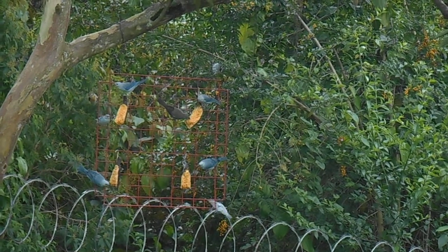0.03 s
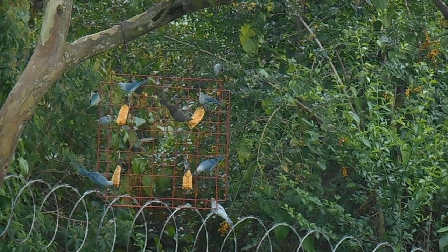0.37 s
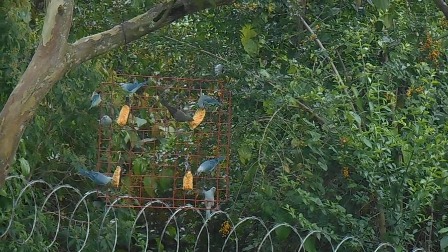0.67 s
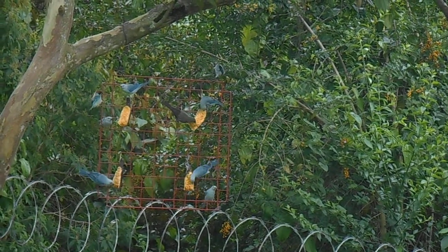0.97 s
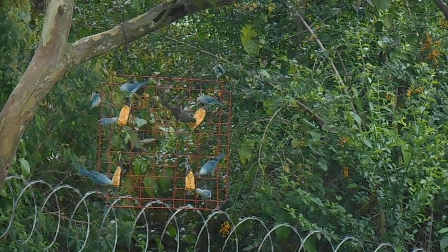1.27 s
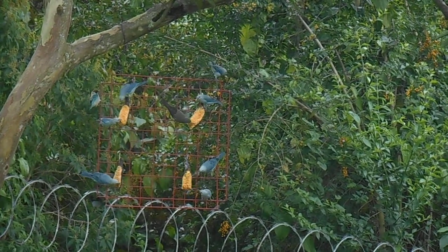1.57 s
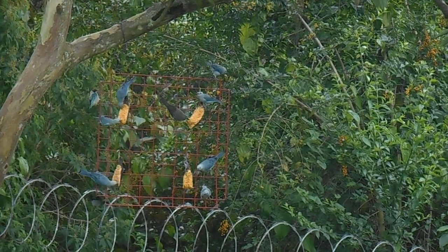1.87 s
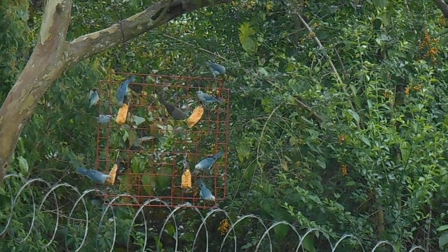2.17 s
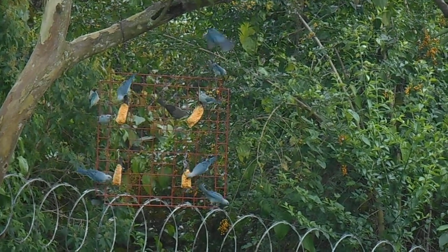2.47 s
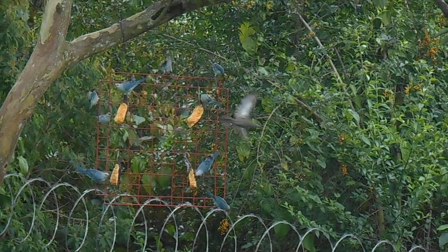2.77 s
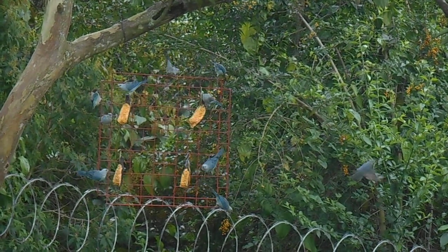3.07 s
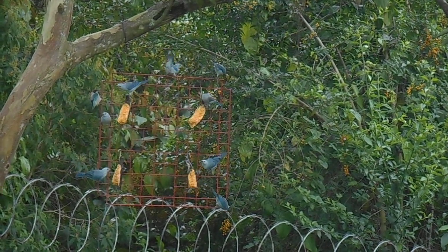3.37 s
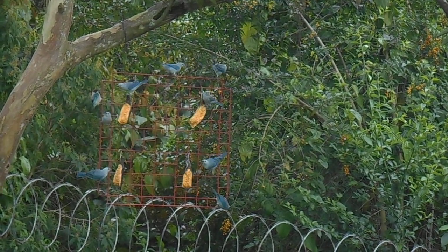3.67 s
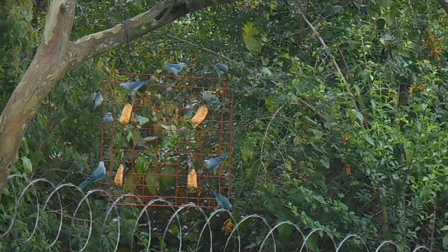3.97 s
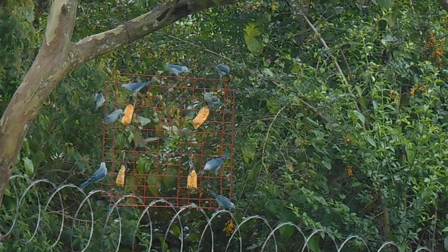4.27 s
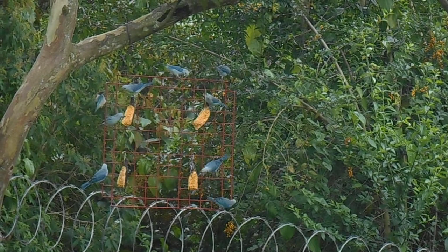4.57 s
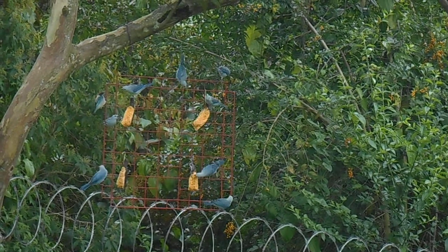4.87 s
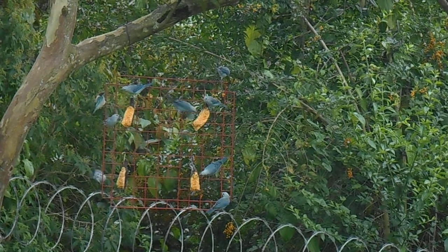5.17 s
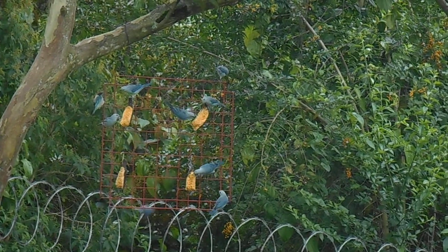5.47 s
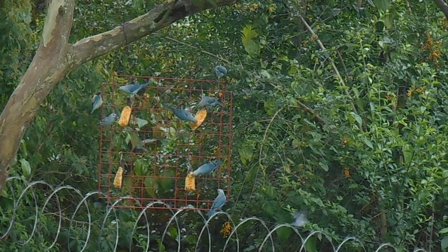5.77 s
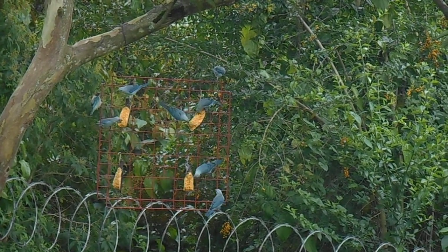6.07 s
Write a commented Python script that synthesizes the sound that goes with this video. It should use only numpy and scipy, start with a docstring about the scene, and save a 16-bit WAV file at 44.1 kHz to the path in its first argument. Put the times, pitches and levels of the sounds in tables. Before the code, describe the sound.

Small birds call sparsely at a garden feeder, several metres from the microphone, over an even hiss and a distant low hum. First comes a quick, high falling chirp, then a fainter, longer whistle, then a handful of short, scratchy squeaks mixed with brief rustles of wings and leaves. Plain notes drift in from farther birds, and a barely audible cricket trills underneath. The foliage softens each call with a short tail.

```python
"""Small birds at a garden feeder

Some metres from the microphone a bird gives a sharp falling 'tseep'; a long thin whistle comes from
cover, then squabbling squeaks, raspy with strain. Wings rustle and far birds add plain notes. Foliage
scatters every call. A faint cricket strokes its wings ten times a second and stops shortly before the
end. Under it all lie a steady outdoor hiss and a distant low drone."""
import sys
import numpy as np
from scipy import signal
from scipy.fft import rfft, irfft, next_fast_len
from scipy.io import wavfile
from scipy.ndimage import map_coordinates

SR = 44100
rng = np.random.default_rng(int(sys.argv[2]) if len(sys.argv) > 2 else 0)


def put_to_file(sound):
    """Save the sound as 16-bit audio at rate SR, in the file named by the first command-line argument."""
    columns = np.atleast_2d(sound).T  # one column per channel
    safe = np.clip(columns, -1, 1)
    whole_steps = np.round(safe * 32767)
    wavfile.write(sys.argv[1], SR, whole_steps.astype(np.int16))


N = 274919
TIME = np.arange(N) / SR

# The hiss of the open garden. Each row: frequency in Hz, relative spectral density in dB.
HISS_SPECTRUM = [(300, -15), (800, -6), (1400, -3.5), (2100, -1), (2550, -0.1), (2850, 1), (3400, -2.5),
                 (4200, -4.5), (5800, -6.5), (7500, -6.5), (8700, -9.5), (10000, -11), (12000, -16.5)]
# The distant drone. Each row: frequency in Hz, relative spectral density in dB.
DRONE_SPECTRUM = [(15, -17), (45, -12), (65, -4.5), (115, -3.5), (250, -0.5), (340, 0.5), (450, -3),
                  (650, -6), (1000, -12.5), (2500, -38)]
# Narrow humming bands in the drone. Each row: centre in Hz, width in Hz, level in dB before the swell.
HUM_BANDS = [(34.6, 3.4, -73), (64.7, 8.7, -67.5), (148.6, 7.5, -67.5), (248.8, 4.6, -75),
             (329.6, 4.8, -65.5), (362.5, 14, -63), (492.6, 13.6, -62.5), (639, 22, -67.5)]
# Birds far off. Each row: start in seconds, length in seconds, pitch in Hz, glide in octaves, level in dB.
FAR_BIRD_NOTES = [ (0.948, 0.0464, 3163, .45, -48), (1.198, 0.0215, 2110, -.1, -43.5),
                  (1.595, .033, 2400, -.4, -53), (3.262, .17, 4700, -0.095, -51),
                  (3.569, .3, 3070, .02, -49.5), (4.322, .018, 4640, .02, -46), (4.638, .16, 2760, 0, -56)]
# Wings and leaves. Each row: time of the peak in seconds, width in seconds, level in dB.
RUSTLE_PUFFS = [(.975, 0.023, -48), (1.607, .012, -45), (3.080, 0.026, -41), (3.348, .015, -41.5),
                (3.612, 0.019, -44), (3.925, 0.018, -48), (5.410, 0.015, -46), (5.74, .025, -49),
                (5.89, .02, -47)]
# The noise of rasps and rustles. Each row: frequency in Hz, relative spectral density in dB.
RASP_SPECTRUM = [(500, -18), (2000, 11.5), (4000, 7), (6500, 10.5), (9500, 3), (12000, -28)]
# The squabble at the feeder. Each row: start in seconds, length in seconds, pitch in Hz, glide in
# octaves, throat resonance in Hz, level in dB, rasp in dB relative to the voice.
SQUEAK_NOTES = [ (2.494, 0.044, 2370, -0.16, 8000, -44.5, 4.5), (2.616, .022, 3700, -.2, 7500, -42.5, -0.5),
                (2.641, .022, 3550, -0.192, 7000, -46, 4), (2.861, .018, 3170, -.04, 9500, -45, -9),
                (2.865, .027, 3379, 0.19, 4300, -38.5, -5), (3.057, 0.0233, 6400, -.37, 6400, -47, -2),
                (3.304, 0.035, 2100, .06, 5700, -38.5, -5), (3.894, 0.025, 3960, 0.204, 4000, -43, 0),
                (4.479, 0.019, 1366, 0.084, 3420, -43, -3), (5.377, .014, 7000, -.03, 7000, -48, -6)]
# The microphone's top treble. Each row: frequency in Hz, gain in dB.
MICROPHONE_RESPONSE = [(10000, 0.5), (10450, -3), (11000, -14), (11650, -12.5), (12200, -22)]

BAND_LIMIT_HZ = 12280


def amp(db):
    """Decibels to gain."""
    return 10 ** (np.asarray(db) / 20)


def unit_rms(x):
    """x at rms 1."""
    return x / np.sqrt(np.mean(x ** 2) + 1e-20)


def gain_at(curve, hz):
    """The gain of a curve of (Hz, dB) points, read on a log frequency axis."""
    points_hz, points_db = np.transpose(curve)
    return amp(np.interp(np.log(hz + 1), np.log(points_hz + 1), points_db))


def filtered(x, response):
    """x through a filter whose gain is response(hz)."""
    size = next_fast_len(N + SR // 2)
    return irfft(rfft(x, size) * response(np.fft.rfftfreq(size, 1 / SR)), size)[:N]


def noise(spectrum):
    """Coloured noise of rms 1."""
    return unit_rms(filtered(rng.standard_normal(N), lambda hz: gain_at(spectrum, hz)))


def wobble(rate):
    """A smooth random curve, rate knots a second."""
    return map_coordinates(rng.standard_normal(int(N * rate / SR) + 4), [TIME * rate])


def tone(hz):
    """A sine of rms 1 that follows a pitch curve."""
    return np.sqrt(2) * np.sin(2 * np.pi * np.cumsum(hz) / SR)


def arch(progress):
    """A rounded swell while progress runs from 0 to 1."""
    return np.sqrt(np.clip(4 * progress * (1 - progress), 0, None))


def arched_note(start_s, length_s, mid_hz, glide_octaves, droop_octaves=0.0588):
    """The samples, swell and pitch of a short gliding note that droops at both ends."""
    span = slice(round(start_s * SR), round((start_s + length_s) * SR))
    progress = np.linspace(0, 1, span.stop - span.start)
    octaves = glide_octaves * (progress - .5) - droop_octaves * (2 * progress - 1) ** 2
    return span, arch(progress), mid_hz * 2 ** octaves


def foliage(call, wet_db, t60_s, echo_db, echo_s):
    """A call reaches the microphone direct, scattered off leaves, and echoed once off a trunk or wall."""
    t = np.arange(SR // 2) / SR
    build_up = 1 - np.exp(-t / 0.0074)
    scatter = rng.standard_normal(len(t)) * amp(-60 * t / t60_s) * build_up
    paths = amp(wet_db) * scatter / np.linalg.norm(scatter)
    paths[0] += 1  # the direct path
    paths[round(echo_s * SR)] += amp(echo_db)
    return signal.fftconvolve(call, paths / np.linalg.norm(paths))[:N]


def garden_ambience(hiss_db, drone_db, hum_crest_s=1.9, hum_swell_s=2, hum_lift_db=2.5):
    """An even outdoor hiss over a distant drone whose narrow humming bands swell once and recede."""
    def bands(hz):
        return sum(amp(db) / np.sqrt(width_hz) / (1 + (2 * (hz - centre_hz) / width_hz) ** 2)
                   for centre_hz, width_hz, db in HUM_BANDS)

    hiss = amp(hiss_db + 0.15 * wobble(2.68)) * noise(HISS_SPECTRUM)
    drone = amp(drone_db + 0.38 * wobble(2.32)) * noise(DRONE_SPECTRUM)
    hum = filtered(rng.standard_normal(N), bands) * np.sqrt(SR / 2)
    swell = amp(hum_lift_db) / np.hypot(1, (TIME - hum_crest_s) / hum_swell_s)
    return hiss + drone + hum * swell


def cricket(start_s, stop_s, release_s, strokes_per_s, level_db, pitch_hz, bend_hz, waver_hz):
    """Each wing stroke rings one short, slightly uneven note that bends up in the middle."""
    t = np.clip(TIME - start_s, 0, None)
    strokes = strokes_per_s * t + .032 * t ** 2 / 2  # the pace quickens a little
    stroke = arch(strokes % 1 / 0.28)  # sounds for 28% of each cycle
    release = np.sqrt(np.clip((stop_s - TIME) / release_s, 0, 1))
    hz = pitch_hz + bend_hz * (stroke ** 2 - 1) + waver_hz * wobble(300)
    uneven_db = level_db + .4 * wobble(6.4) + 1.6 * wobble(200)
    return release * stroke * amp(uneven_db) * tone(hz)


def far_birds(quaver):
    """Plain notes from far off: only the fundamental carries to the microphone."""
    out = np.zeros(N)
    waver = 1 + quaver * wobble(250)
    for start_s, length_s, mid_hz, glide, db in FAR_BIRD_NOTES:
        span, swell, hz = arched_note(start_s, length_s, mid_hz, glide)
        out[span] += amp(db) * swell * tone(hz * waver[span])
    return out


def rustles():
    """Birds shifting among the leaves make brief grainy puffs."""
    puffs = sum(amp(db) * np.exp(-.5 * ((TIME - peak_s) / width_s) ** 2)
                for peak_s, width_s, db in RUSTLE_PUFFS)
    grain = noise(RASP_SPECTRUM) * amp(2.7 * wobble(300))
    return puffs * unit_rms(grain)


def squeaks(jitter, throat_db_per_octave=17.5):
    """Short notes whose harmonics weaken away from one throat resonance; the strained voice adds a rasp."""
    out = np.zeros(N)
    rasp = noise(RASP_SPECTRUM)
    waver = 1 + jitter * wobble(500)
    for start_s, length_s, mid_hz, glide, throat_hz, db, rasp_db in SQUEAK_NOTES:
        span, swell, hz = arched_note(start_s, length_s, mid_hz, glide)
        voice = np.zeros(len(hz))
        for harmonic in range(1, 5):
            if harmonic * mid_hz < BAND_LIMIT_HZ:
                octaves_off = abs(np.log2(harmonic * mid_hz / throat_hz))
                voice += amp(-throat_db_per_octave * octaves_off) * tone(harmonic * hz * waver[span])
        out[span] += amp(db) * swell * (unit_rms(voice) + amp(rasp_db) * rasp[span])
    return out


def whistle(start_s, length_s, from_hz, to_hz, plunge, crest_db, swell_db, quaver, fade_db=7.5):
    """A bird's pure, quavering note swells and fades as it falls: evenly at plunge 1, later above that."""
    progress = np.clip((TIME - start_s) / length_s, 0, 1)
    gate = np.clip(np.minimum(progress, 1 - progress) * length_s / 0.0021, 0, 1)
    hz = from_hz + (to_hz - from_hz) * progress ** plunge
    db = crest_db - np.interp(progress, [0, 0.54, 1], [swell_db, 0, fade_db])  # loudest just past halfway
    waver = 1 + quaver * wobble(250)
    return gate * amp(db) * tone(hz * waver)


def scene():
    """One spot in the garden, in mono: near birds arrive mostly direct, the hidden one through leaves."""
    tseep = whistle(start_s=.050, length_s=.044, from_hz=8140, to_hz=5760, plunge=3.7,
                    crest_db=-29.5, swell_db=13, quaver=0.0033)
    thin_call = whistle(start_s=1.734, length_s=.322, from_hz=9000, to_hz=7210, plunge=0.99,
                        crest_db=-42.8, swell_db=9, quaver=0.009)
    near = foliage(tseep, wet_db=-3, t60_s=0.28, echo_db=-14, echo_s=0.024)
    hidden = foliage(thin_call, wet_db=6, t60_s=0.55, echo_db=-10, echo_s=0.032)
    far = foliage(far_birds(quaver=0.0172), wet_db=-7, t60_s=0.25, echo_db=-9, echo_s=0.037)
    squabble = foliage(squeaks(jitter=0.0196), wet_db=-8, t60_s=0.29, echo_db=-24, echo_s=.025)
    insect = cricket(start_s=.066, stop_s=5.02, release_s=0.36, strokes_per_s=10.037,
                     level_db=-50.5, pitch_hz=5690, bend_hz=160.8, waver_hz=30)
    birds = near + hidden + far + squabble + rustles()
    mono = birds + insect + garden_ambience(hiss_db=-41.0, drone_db=-52)
    return np.array([mono, mono])


def record(dry):
    """The microphone rolls off the top treble and the recorder keeps nothing above its band limit."""
    def response(hz):
        return gain_at(MICROPHONE_RESPONSE, hz) * (hz < BAND_LIMIT_HZ)

    return np.array([filtered(channel, response) for channel in dry])


dry = scene()
out = record(dry)
put_to_file(out)
```